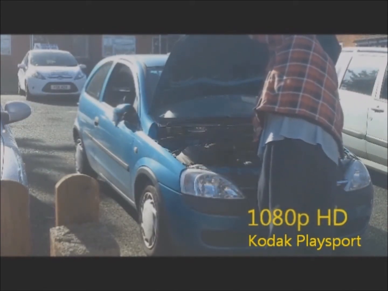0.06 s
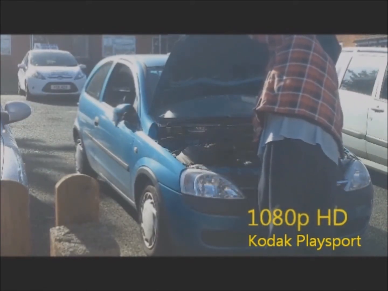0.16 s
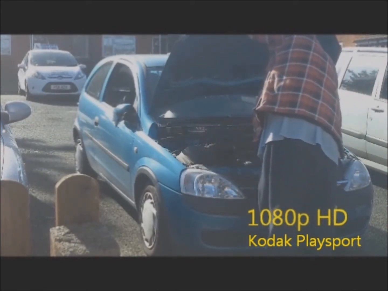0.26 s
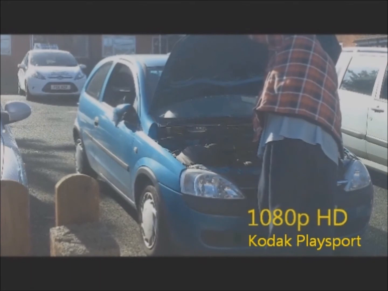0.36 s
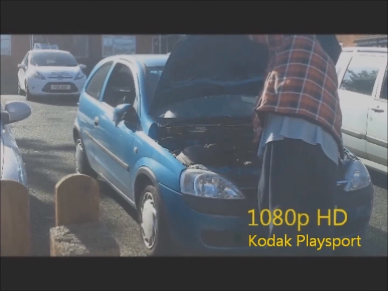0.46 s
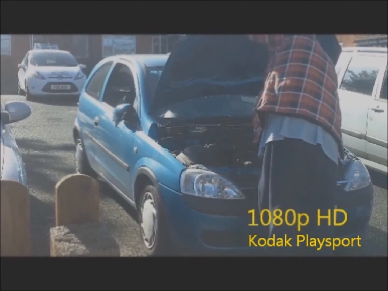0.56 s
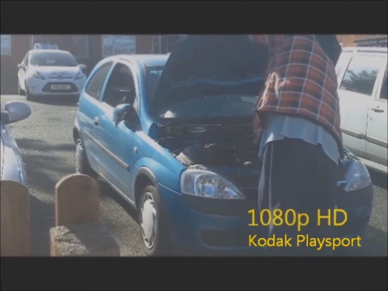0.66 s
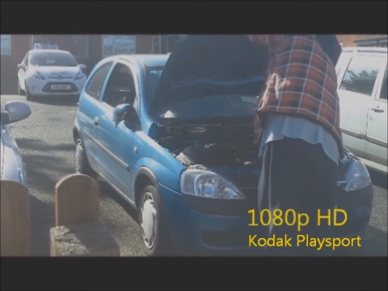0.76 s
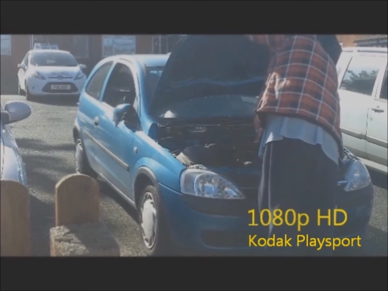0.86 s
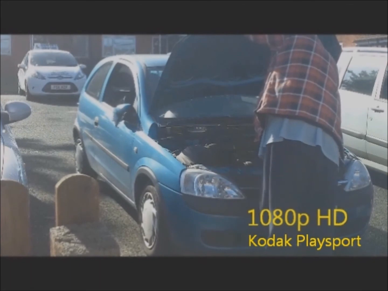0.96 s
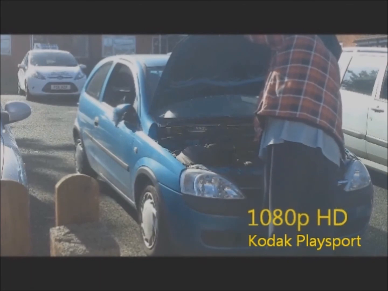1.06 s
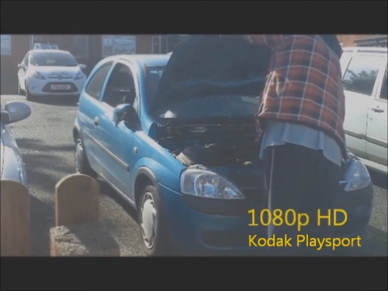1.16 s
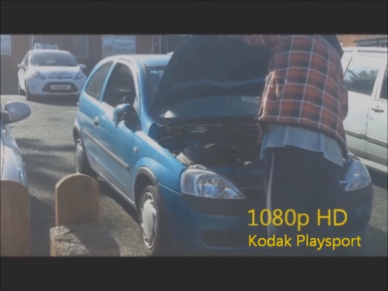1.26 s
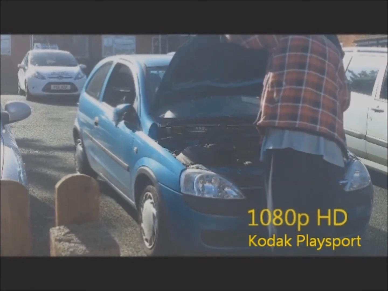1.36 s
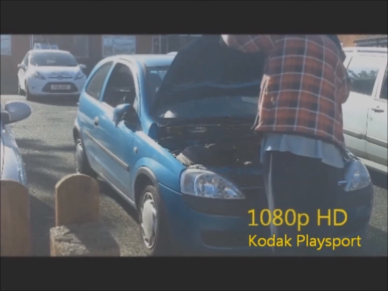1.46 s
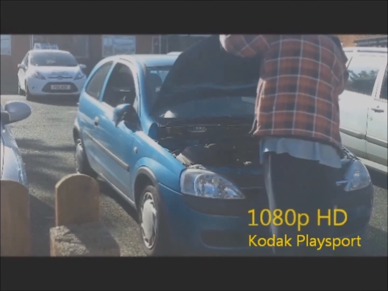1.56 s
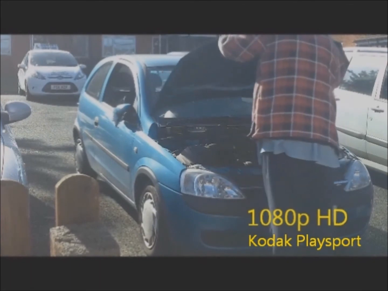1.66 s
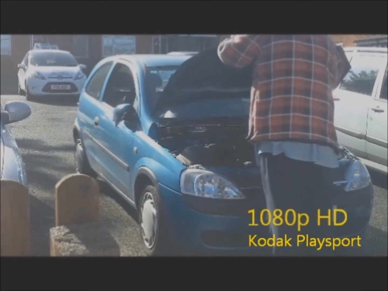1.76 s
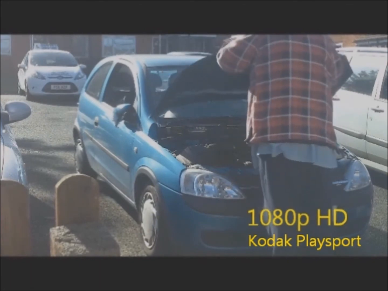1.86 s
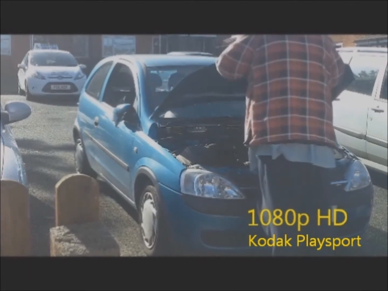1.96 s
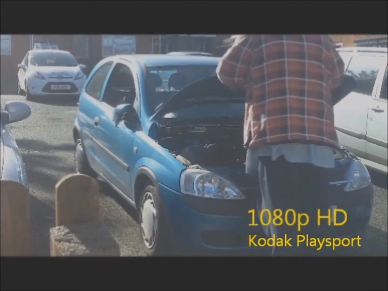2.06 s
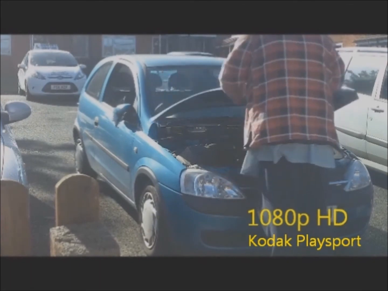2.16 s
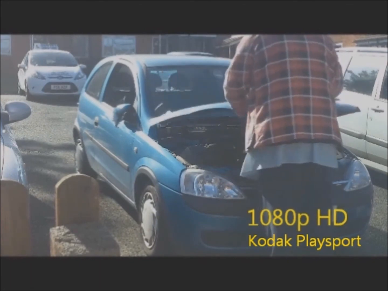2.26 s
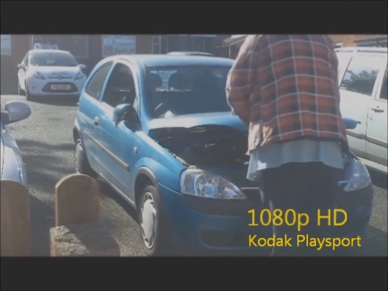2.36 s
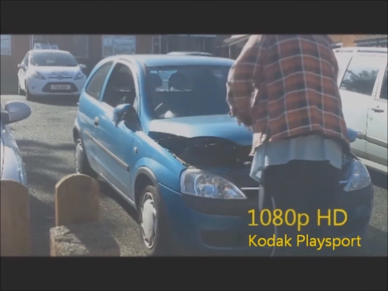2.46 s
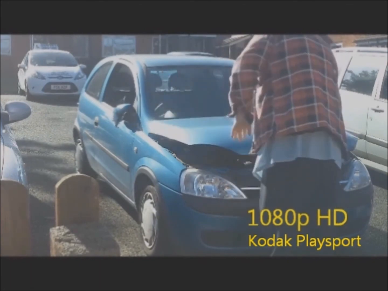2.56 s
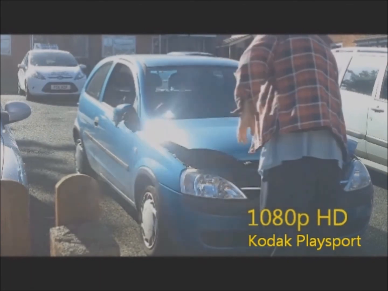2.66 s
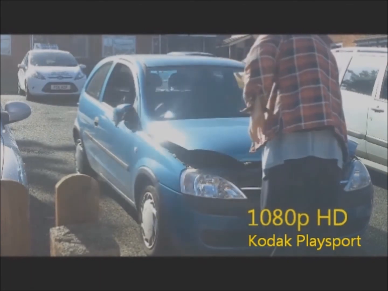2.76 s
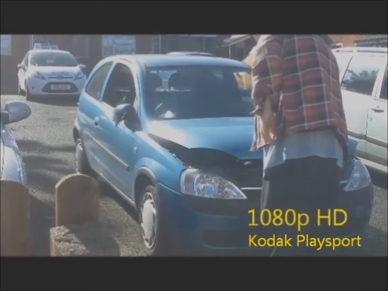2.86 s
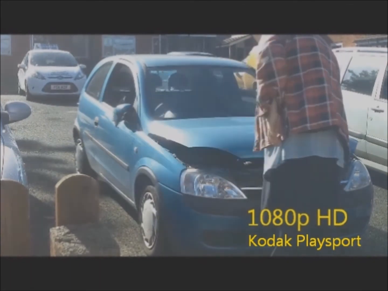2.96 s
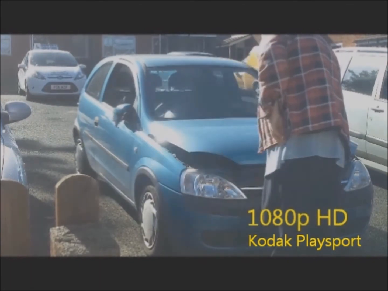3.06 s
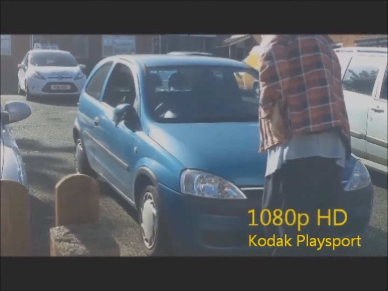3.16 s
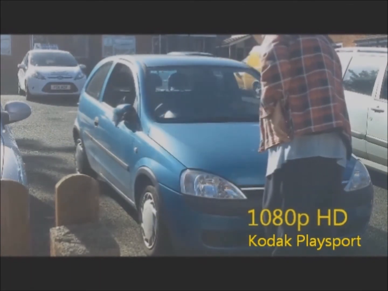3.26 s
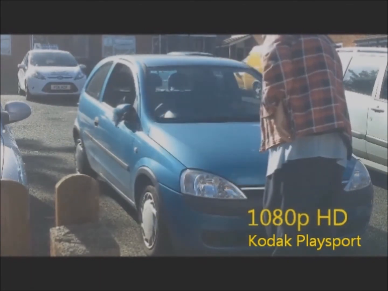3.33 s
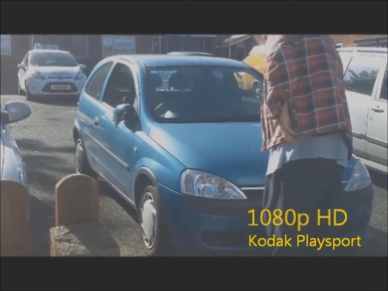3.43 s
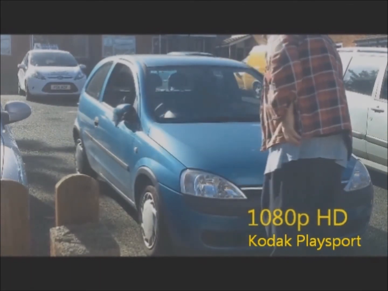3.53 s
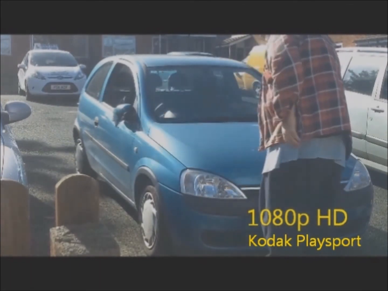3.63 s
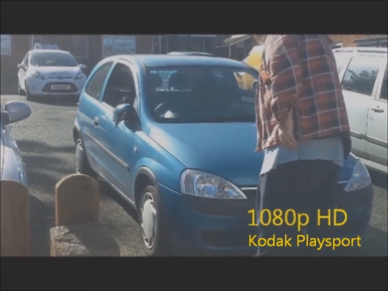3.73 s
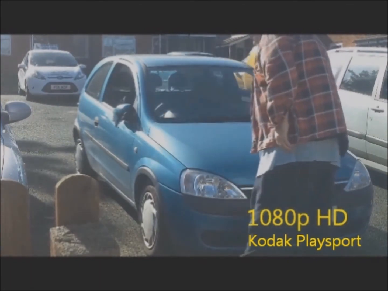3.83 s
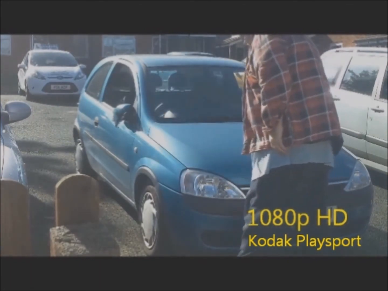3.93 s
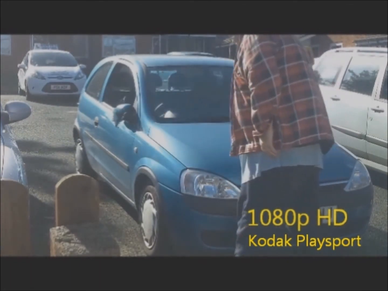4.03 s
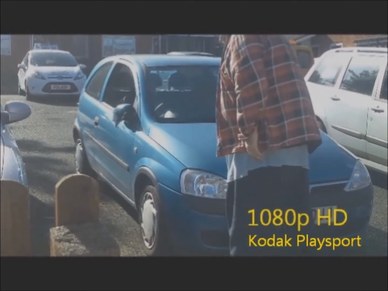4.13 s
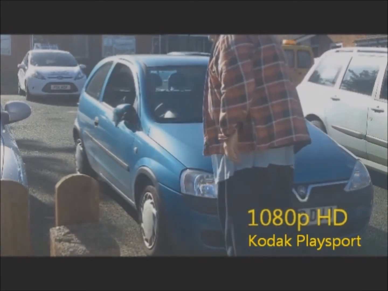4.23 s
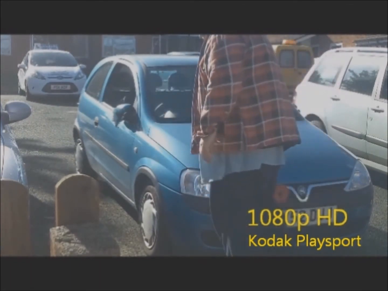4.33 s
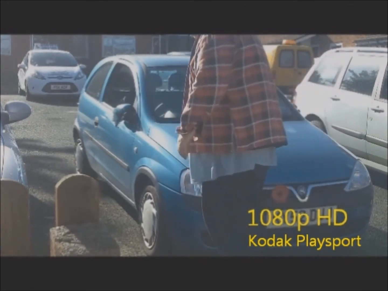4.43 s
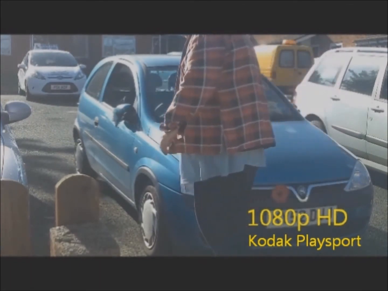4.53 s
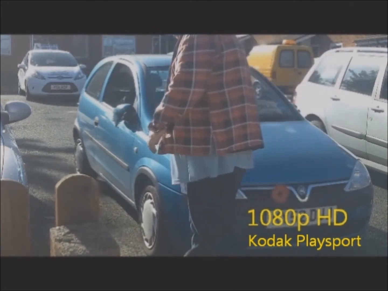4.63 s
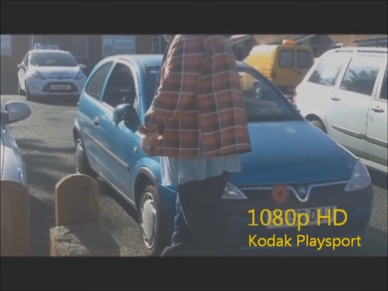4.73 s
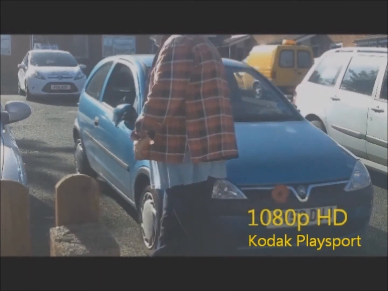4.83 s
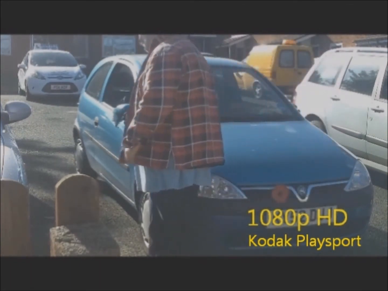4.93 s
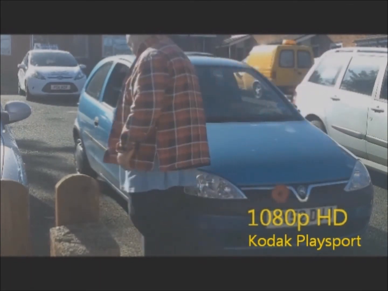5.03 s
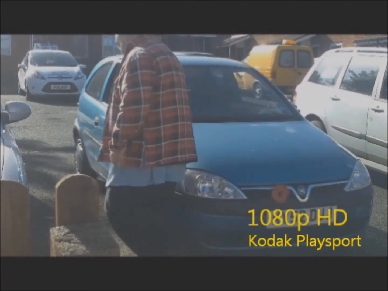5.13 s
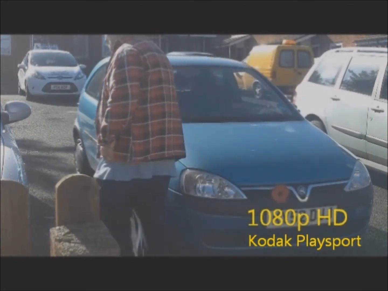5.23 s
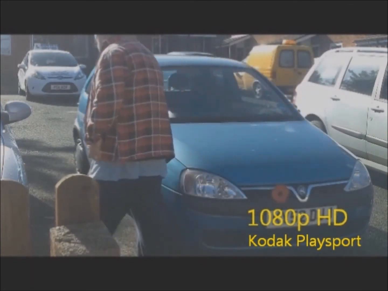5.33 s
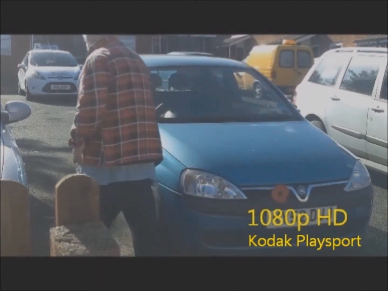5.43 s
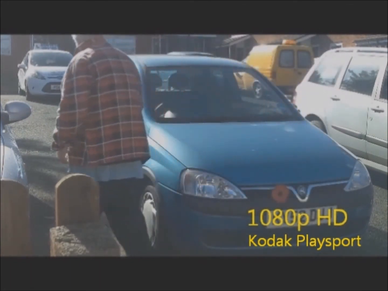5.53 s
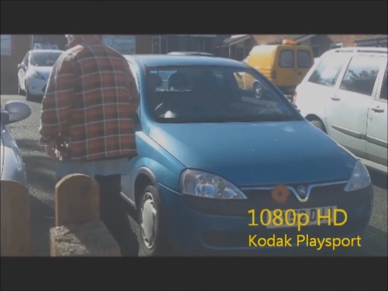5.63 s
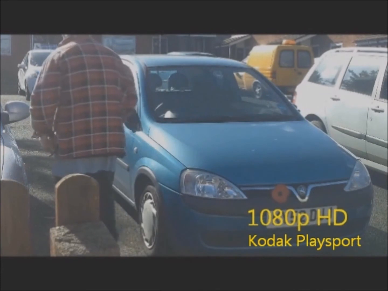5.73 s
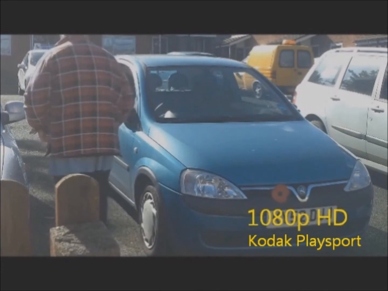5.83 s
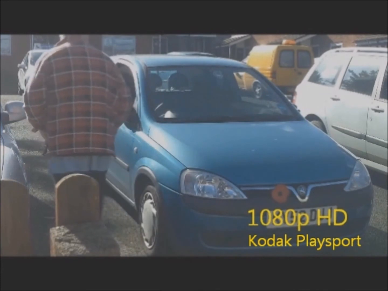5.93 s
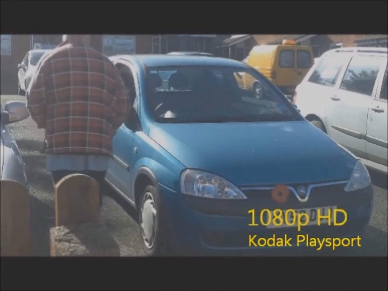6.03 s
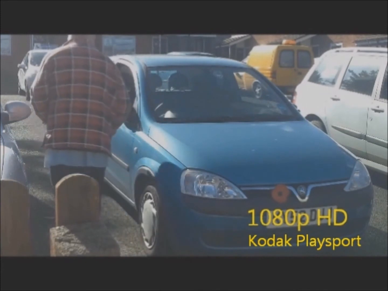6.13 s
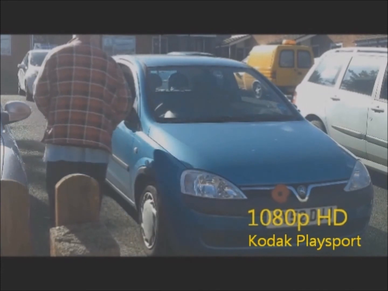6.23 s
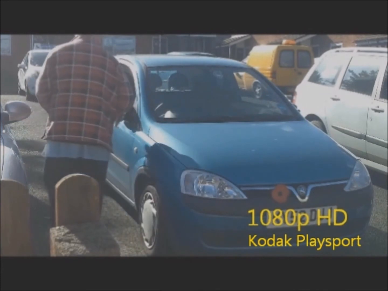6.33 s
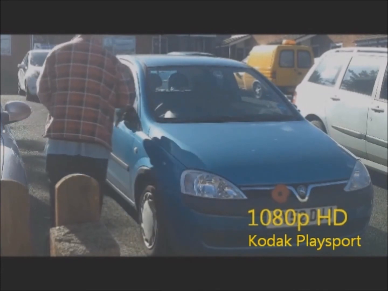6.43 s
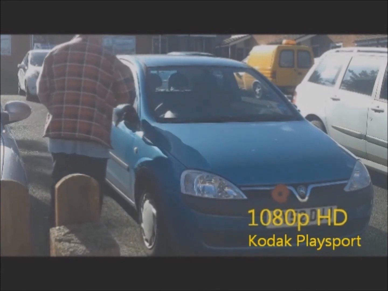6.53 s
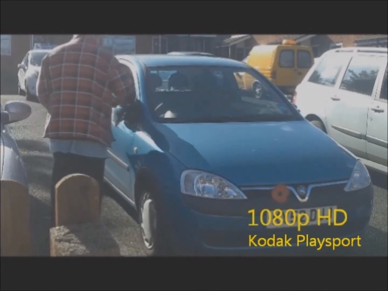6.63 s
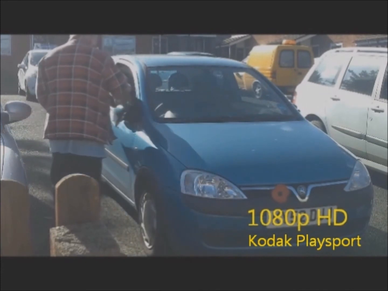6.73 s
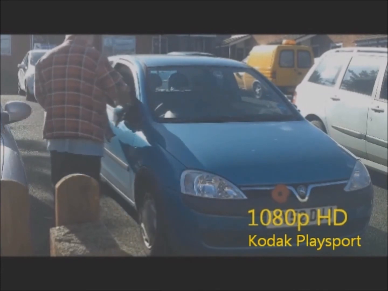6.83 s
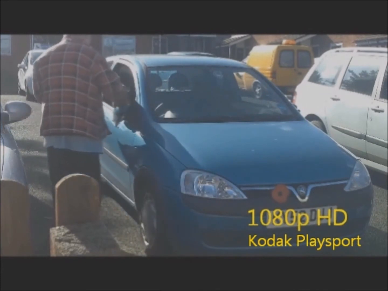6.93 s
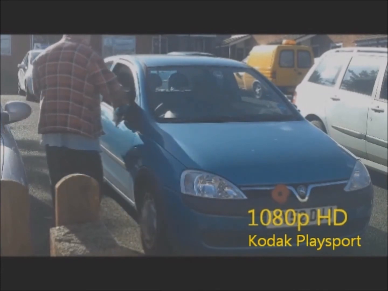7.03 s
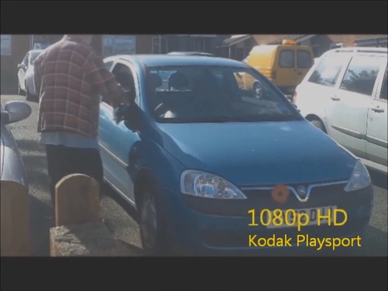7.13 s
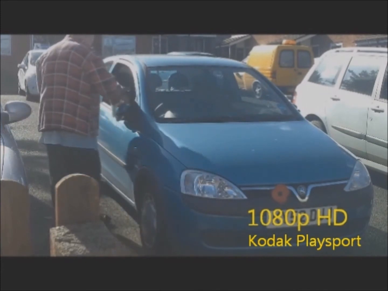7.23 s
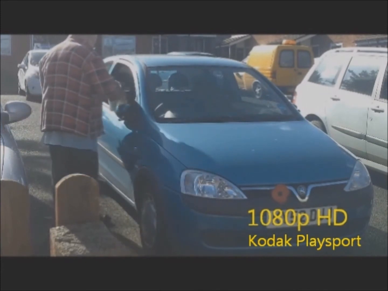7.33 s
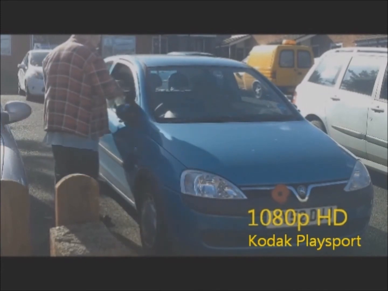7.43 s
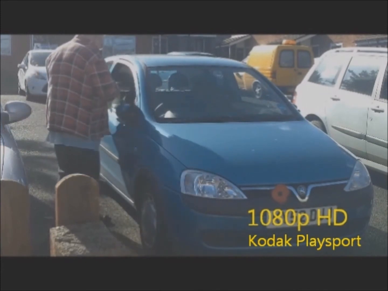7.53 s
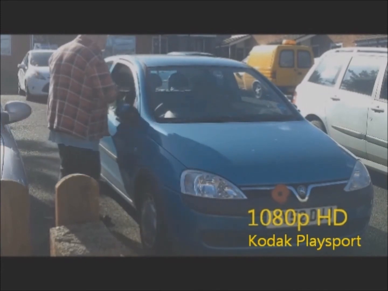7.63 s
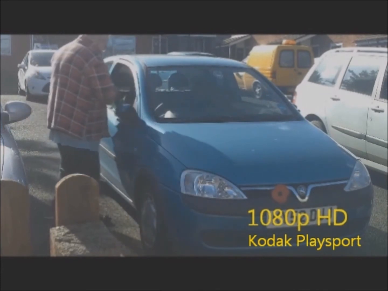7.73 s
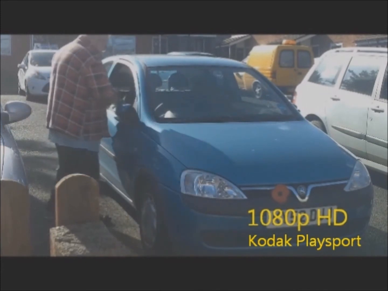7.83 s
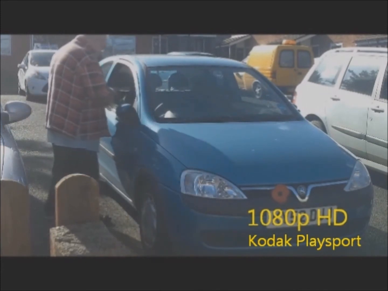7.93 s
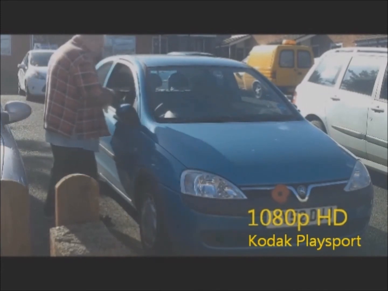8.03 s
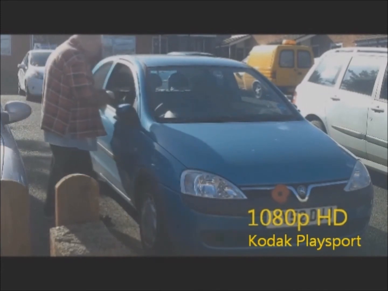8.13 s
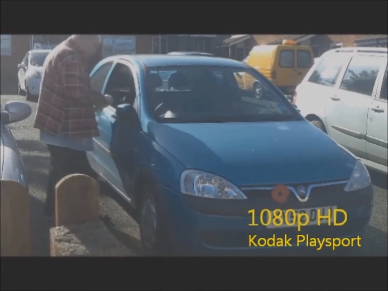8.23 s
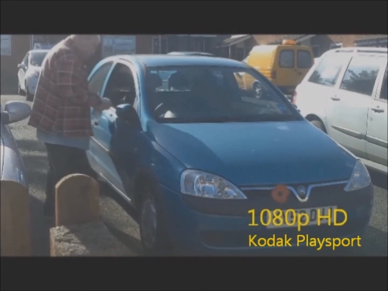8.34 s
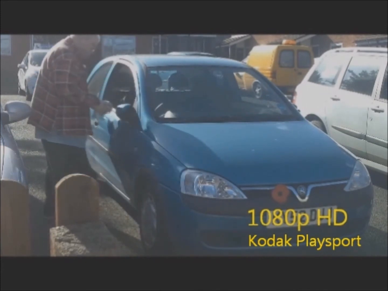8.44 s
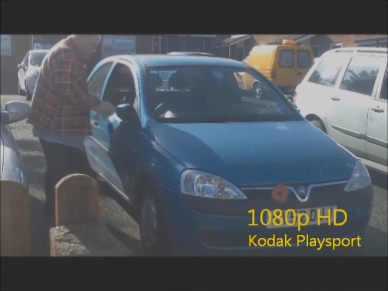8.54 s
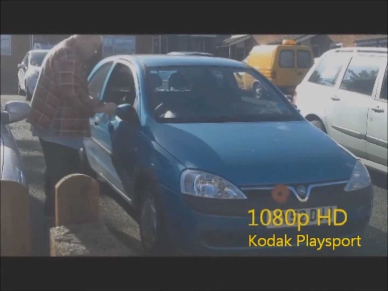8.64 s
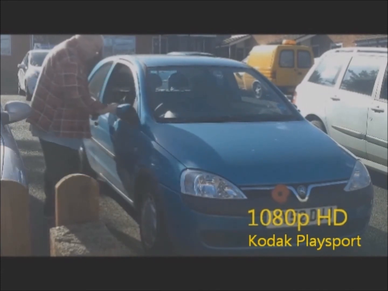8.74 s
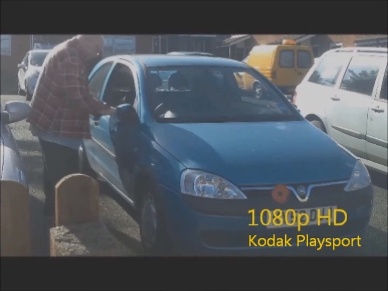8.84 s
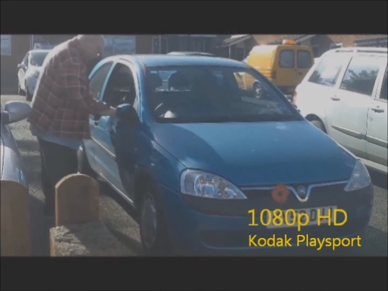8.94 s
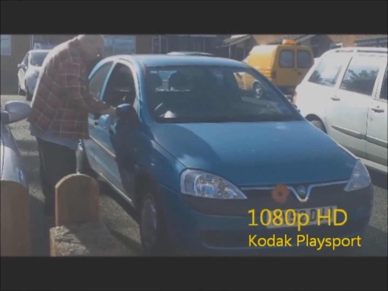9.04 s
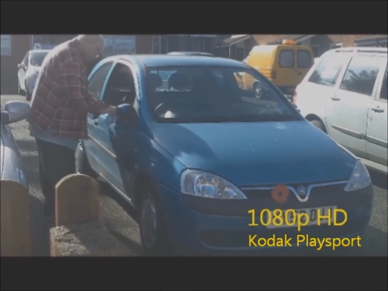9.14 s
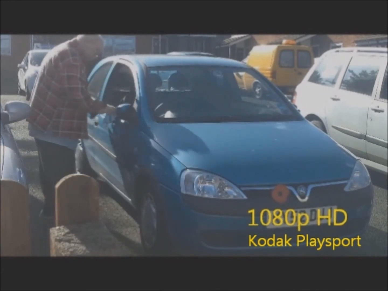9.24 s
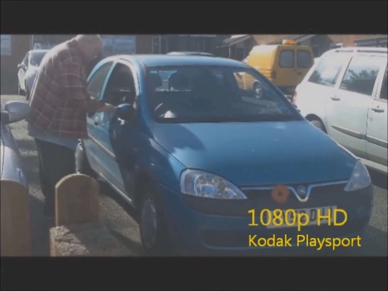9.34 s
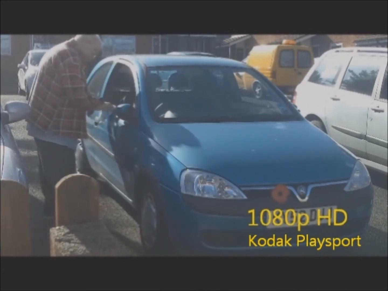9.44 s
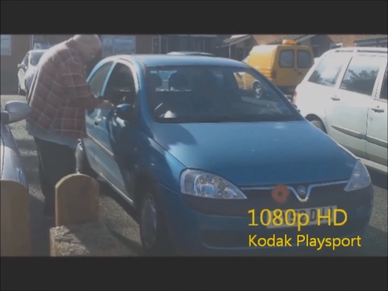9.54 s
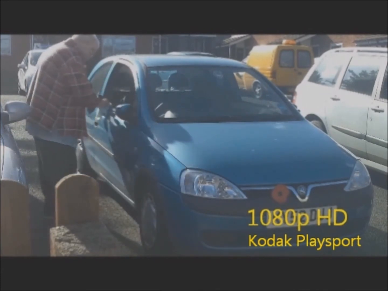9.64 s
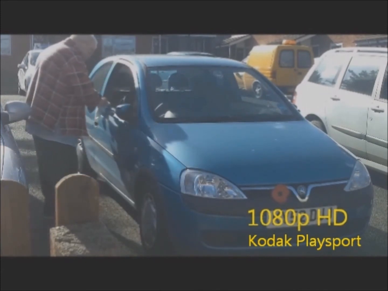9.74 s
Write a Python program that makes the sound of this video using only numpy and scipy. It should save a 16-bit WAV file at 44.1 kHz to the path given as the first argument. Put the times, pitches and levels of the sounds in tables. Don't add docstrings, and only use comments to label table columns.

```python
import sys
import numpy as np
from scipy import signal
from scipy.io import wavfile
from scipy.ndimage import uniform_filter1d

SR = 44100
rng = np.random.default_rng(int(sys.argv[2]) if len(sys.argv) > 2 else 0)


def nominal_scale(level):
    x = np.asarray(level, float) / 20
    return 10 ** x


def waveform_to_disk(signal):
    frames = np.transpose(np.atleast_2d(signal))
    scaled = np.clip(frames, -1, 1) * 32767
    samples = np.round(scaled).astype(np.int16)
    wavfile.write(sys.argv[1], SR, samples)


N = 431738

# frequency in Hz, density in dB per Hz.
TRAFFIC_SPECTRUM = [(8.8, -37.5), (15, -5.5), (33, -4), (81, -2.5), (113, -13), (150, -8), (172, -17.5),
                    (229, -13.5), (334, -17.5), (1040, -16.5), (2010, -24), (3000, -26), (3900, -41),
                    (6600, -120)]
# time in seconds, level in dB.
TRAFFIC_LEVEL = [(0, -48), (1.0, -48.6), (3.1, -49), (3.8, -47.5), (5.5, -50), (9.79, -50.5)]

# start in seconds, peak in dB, clatter T60 in seconds, rise in seconds, brightness in Hz.
KNOCK_CONTACTS = [
    (.822, -23.5, 0.046, 0.0017, 7000),
    (.828, -25.5, 0.044, .002, 8000),
    (.840, -24.5, 0.054, 0.0018, 4500),
    (.848, -25, 0.048, 0.0014, 4500),
    (.855, -32, 0.11, .002, 4000),
    (.89, -44, 0.15, .01, 3500),
]
SLAM_CONTACTS = [(3.3255, -8, 0.021, 0.0034, 16000), (3.335, -16, .04, .001, 7000),
                 (3.343, -24, .04, .002, 6000), (3.350, -17, 0.039, 0.0045, 9000),
                 (3.357, -17.5, .04, 0.0023, 12000), (3.3635, -13.5, 0.044, 0.0014, 14000),
                 (3.373, -21, 0.041, .002, 12000), (3.3795, -25, 0.045, .001, 9000),
                 (3.390, -32, .05, 0.0018, 9000), (3.403, -31, 0.033, .002, 9000),
                 (3.443, -33, .06, .002, 6000)]
# centre in Hz, width in Hz, level in dB.
PROP_MODES = [(495, 32, 5), (644, 34, 3.5), (1170, 80, -6), (1670, 110, -7), (2280, 330, 0), (3000, 75, 0),
              (4920, 250, -8)]
# centre in Hz, width in Hz, level in dB.
LATCH_MODES = [(920, 67, 0), (997, 110, -2), (1336, 340, 3.5), (2300, 200, -1.5), (2790, 92, 0.5),
               (3380, 110, 1), (4010, 110, 0), (4620, 110, -11), (4970, 150, -7), (5300, 140, -12)]

# start in seconds, peak in dB, contact in seconds, signed direction (ratio).
BOUNCES = [(3.329, -18.5, 0.0013, 1), (3.338, -17, 0.0014, 1), (3.351, -18, 0.0031, 0.93),
           (3.359, -10, 0.0025, 1), (3.366, -7, 0.0077, 1), (3.379, -13, 0.0044, 1),
           (3.402, -10.5, .004, -1.05), (3.405, -21, .005, 1), (3.443, -16, 0.0027, 0.81),
           (3.464, -16, 0.0043, 1), (3.488, -18.5, 0.0029, -1.3), (3.513, -16, 0.006, -1.1),
           (3.536, -15, .004, 1), (3.596, -37, 0.0068, -0.88), (.828, -43, 0.0012, 1),
           (.853, -25.5, 0.0055, 1), (0.867, -26, 0.0029, 0.81), (.900, -29, 0.003, -1)]
# frequency in Hz, level in dB, T60 in seconds.
PANEL_MODES = [(69, -4, 0.43), (108.3, -5, 0.97), (130.3, -6.5, .25), (151.8, 1, 0.6), (186, -11, 0.23),
               (252, -5, 0.5), (316, -18.5, .3), (418, -17, .25), (454, -24.5, .25), (620, -35, .2)]
# start in seconds, top in dB, swell in seconds, hold in seconds, fall in dB per second.
PANEL_SHUDDER = [
    (.83, -40, .07, .005, 200),
    (3.327, -20.5, 0.036, 0.094, 84),
]
BODY_SHUDDER = [
    (.83, -41, .025, .03, 150),
    (3.327, -29, .09, .24, 115),
]
CAR_S = 4.6
SWELL_DB = 24
ROCK_HZ, ROCK_DB = 7.94, 2.5

# frequency in Hz, T60 in seconds.
YARD_DECAY = [(200, 1.0), (1000, 1), (3000, 0.45), (6000, 0.23), (10000, 0.15)]
# delay in seconds, level in dB.
WALL_ECHOES = [
    (.075, -30),
    (0.119, -31.5),
    (.16, -30),
    (.2, -30.5),
    (.24, -34.5),
    (.28, -36),
    (.36, -38.5),
]

# start in seconds, peak in dB, centre in Hz.
TAPS = [
    (2.054, -41, 1070),
    (5.058, -33.5, 269),
    (5.066, -31, 234),
    (5.582, -34.5, 423),
    (5.607, -39.5, 940),
    (6.184, -35, 560),
]
# start in
# seconds, peak in # dB, centre in Hz, share of broad edge (ratio).
CLICKS = [(2.3175, -34, 3200, .46), (5.649, -36, 4730, 1.5), (6.154, -42, 3240, 1.5),
          (6.171, -34, 3250, 1.1), (6.3478, -30.5, 3140, 0.79), (6.351, -34, 3300, 0.72),
          (6.878, -42, 2500, .8), (7.094, -36, 2920, .8), (7.153, -27.5, 5200, .56),
          (7.179, -36, 3320, 1.1), (7.508, -32.5, 1780, .6), (7.5153, -28.5, 3120, .92),
          (9.766, -43, 2400, .9)]
# start in seconds, length in seconds, level in dB.
SCRAPES = [
    (6.15, 0.038, -47.5),
    (6.999, .05, -55),
    (7.469, 0.045, -52),
    (8.387, 0.081, -46),
    (8.559, 0.038, -57),
    (8.626, 0.088, -47),
]
# start in seconds, peak in dB, centre in Hz.
KEYS = [(8.393, -39, 2160), (8.404, -36, 5200), (8.408, -29, 2030), (8.417, -29.5, 1850),
        (8.421, -29, 4770), (8.424, -33, 1800), (8.430, -34, 1550), (8.439, -41, 5000), (8.464, -38, 1900),
        (8.564, -39, 4900), (8.571, -39, 3200), (8.602, -41, 5000), (8.624, -35, 3070), (8.644, -39, 3300),
        (8.651, -39, 3000), (8.665, -32, 3430), (8.672, -31.5, 3200), (8.6765, -28, 2940),
        (8.689, -35, 5200)]
CLICK_Q, CLICK_T60_S = 3.7, .023
KEY_Q, KEY_T60_S, KEY_EDGE = 5, 0.017, 0.67
TAP_WIDTH_HZ, TAP_T60_S = 100, 0.034

# time in seconds, level in dB.
BREEZE = [(5.8, -56), (6.2, -48.5), (7.0, -44), (7.2, -38), (8.1, -37.5), (8.5, -35.5), (9.5, -34),
          (9.79, -24.5)]
# peak time in seconds, peak in dB, sharp edges in dB re peak, build-up in seconds.
GUSTS = [(6.25, -48, 11, .03), (6.52, -37, -10, .25), (6.65, -36, -7, .07), (6.87, -36, -4.5, 0.18),
         (7.04, -34, -13, .12), (7.45, -38, -2, .07), (7.57, -33, -14, .12), (7.8, -29.5, -15, .06),
         (8.25, -23.5, -18, .08), (8.37, -36.5, -4.5, .07), (8.5, -29, -22, 0.22), (8.58, -34.5, 1, .06),
         (8.7, -26.5, -30, .2), (8.77, -26.5, -12, .1), (9.08, -19.5, -11.5, .22), (9.24, -22, -13, .06),
         (9.4, -19.5, -23, .14), (9.59, -24.5, -9, .06), (9.73, -20, -13, 0.056)]
# peak time in seconds, peak in dB, rise in seconds, signed direction (ratio).
EDDIES = [(6.258, -20, 0.0022, 0.97), (6.434, -27.5, .003, -0.93), (6.649, -18.5, 0.0028, -1),
          (7.446, -24, .003, -0.94), (7.455, -25, 0.0046, 1), (7.795, -30.5, 0.0023, -1.2),
          (8.387, -22, 0.0027, -0.91), (8.454, -19, 0.0041, -1.1), (8.583, -26.5, 0.0013, -0.94),
          (8.764, -27.5, 0.0025, -1.1), (8.866, -25, 0.004, -1.1), (8.935, -18, 0.0011, 1),
          (8.966, -20.5, 0.0016, -1.1), (8.988, -21, .002, 1), (9.003, -18, 0.002, 1),
          (9.050, -22, 0.0016, -1.1), (9.059, -11.5, 0.0042, 1), (9.066, -9.5, 0.0024, -0.96),
          (9.077, -19, .006, 1), (9.089, -25, 0.001, -1), (9.24, -19, 0.0036, -1.1),
          (9.498, -27, 0.0016, 1), (9.588, -21, 0.0012, -1.1), (9.603, -16.5, 0.003, -1.1),
          (9.67, -19, 0.0032, -1.2), (9.766, -10, 0.0021, 1), (9.776, -19, 0.0019, -1.1),
          (9.784, -16, .008, -1.2)]
BUILD_DB, CALM_EDGE_DB = 16, -22
GUST_FALL_DB_PER_S, EDGE_FALL_DB_PER_S = 250, 400

# start in seconds, level in dB, from in Hz, to in Hz, length in seconds.
CHIRP = (9.464, -49, 4450, 5050, .02)

# frequency in Hz,
# gain in dB.
PORT_RESPONSE = [(3500, -1), (4900, -2), (5150, -6.5), (6500, -15), (7100, -20.5), (7500, -27.5),
                 (9000, -30), (9400, -22), (12000, -21.5), (13200, -23), (15250, -23), (15450, -40),
                 (15800, -91)]
# centre in Hz, width in Hz, depth in dB.
TREBLE_DIPS = [(4196, 212, -15.5), (7970, 320, -6), (8720, 100, -13), (12650, 300, -22)]
HISS_DB = -53.5
CEILING = .62


def evened(x):
    return x / np.sqrt(np.mean(x ** 2) + 1e-20)


def read(points, hz):
    f, value = np.transpose(points)
    return np.interp(np.log(hz + 1), np.log(f + 1), value)


def curve(rows, off_db=-120):
    s, *columns = np.transpose(rows)
    t = np.arange(N) / SR
    return [np.interp(t, s, c, off_db, off_db) for c in columns]


def add(mix, s, sound):
    part = mix[round(s * SR):][:len(sound)]
    part += sound[:len(part)]


def resonate(x, hz, width_hz):
    pole = np.exp((2j * np.pi * hz - np.pi * width_hz) / SR)
    return 2 * signal.lfilter([1 - abs(pole)], [1, -pole], x).real


def band(x, lo_hz, hi_hz, order=2):
    sos = signal.butter(order, [lo_hz, hi_hz], "bandpass", fs=SR, output="sos")
    return signal.sosfilt(sos, x)


def burst(t60_s, rise_s, size=6000):
    t = np.arange(size) / SR
    rise = 1 - np.exp(-t / max(rise_s, 1e-4))
    shape = rise * nominal_scale(-60 * t / max(t60_s, .004))
    return rng.standard_normal(size) * shape / shape.max()


def traffic(patchy_db, tilt_db):
    frames, hz = N // 512 + 5, np.fft.rfftfreq(2048, 1 / SR)
    a, b, patches = rng.standard_normal((frames, 1025, 3)).T
    patches = uniform_filter1d(patches, 20, 0)
    patches = evened(uniform_filter1d(patches, 8, 1))
    top_hz, top_db = TRAFFIC_SPECTRUM[-3]
    slope_db = top_db + tilt_db * np.log2(hz / top_hz + 1e-9)
    colour_db = np.where(hz < top_hz, read(TRAFFIC_SPECTRUM, hz), slope_db)
    spectra = (a + 1j * b) * nominal_scale(colour_db[:, None] + patchy_db * patches)
    x = signal.istft(spectra, nperseg=2048, noverlap=1536)[1][:N]
    level_db = curve(TRAFFIC_LEVEL, None)[0]
    return x / np.std(band(x, 430, 3160, order=4)) * nominal_scale(level_db)


def clatter(contacts, modes, ring, grit_db):
    start, drive = contacts[0][0] - .01, np.zeros(SR // 2)
    for s, db, t60_s, rise_s, top_hz in contacts:
        hit = band(burst(t60_s, rise_s), 100, min(1.05 * top_hz, 20000))
        add(drive, s - start - .001, nominal_scale(db) * hit)
    grit = uniform_filter1d(rng.standard_normal(len(drive)), 16) * 2.2
    drive *= nominal_scale(grit_db * grit)
    rung = np.zeros(len(drive))
    for hz, width_hz, db in modes:
        rung += nominal_scale(db) * resonate(drive, hz, width_hz) / np.sqrt(width_hz)
    direct = band(drive, 300, 18500, order=1)
    out = np.zeros(N)
    add(out, start, direct + ring * rung * np.linalg.norm(direct) / np.linalg.norm(rung))
    return out


def shudder_gain(rows):
    start_s, db, swell_s, hold_s, fall = np.transpose(rows)[:, :, None]
    u = np.arange(round(CAR_S * SR)) / SR - start_s
    level_db = db - SWELL_DB * np.maximum(1 - u / swell_s, 0) ** 2
    level_db = level_db - fall * np.maximum(u - swell_s - hold_s, 0)
    rock_db = ROCK_DB * np.sin(2 * np.pi * ROCK_HZ * u)
    return (nominal_scale(level_db + rock_db) * (u > 0)).sum(0)


def panel():
    force = np.zeros(round(CAR_S * SR))
    for s, db, contact_s, way in BOUNCES:
        push = np.hanning(max(round(contact_s * 2 * SR), 5))
        add(force, s - .002, way * nominal_scale(db) * push)
    shudder = rng.standard_normal(len(force))
    rung, shaken = np.zeros((2, len(force)))
    for hz, db, t60_s in PANEL_MODES:
        width_hz = np.log(1000) / np.pi / t60_s
        rung += nominal_scale(db) * resonate(force, hz, width_hz) * t60_s
        if hz > 120:
            shaken += nominal_scale(db) * resonate(shudder, hz, 21)
    deep = resonate(shudder, 68, 18) + 0.62 * resonate(shudder, 113, 11) + 0.3 * band(shudder, 22, 53)
    body = shudder_gain(PANEL_SHUDDER) * evened(band(shaken, 120, 595))
    body += shudder_gain(BODY_SHUDDER) * evened(band(deep, 20, 114))
    direct = 0.78 * band(force, 62, 900, order=1)
    return np.pad(direct + 4.6 * rung + body, (0, N - len(force)))


def yard(x, wet_db, wall_smear_s):
    taps = np.zeros(SR)
    at = np.arange(300, SR - 22, 22)
    taps[at + rng.integers(0, 22, len(at))] = rng.choice([-1., 1.], len(at))
    hz, t, z = signal.stft(taps, SR, nperseg=256)
    decay = nominal_scale(-60 * t / read(YARD_DECAY, hz)[:, None])
    tail = signal.istft(z * decay, SR, nperseg=256)[1]
    tail = band(tail, 60, 6000, order=1)
    tail *= nominal_scale(wet_db) / np.linalg.norm(tail)
    for s, db in WALL_ECHOES:
        echo = band(burst(wall_smear_s, 0.004), 400, 4000, order=1)
        add(tail, s, nominal_scale(db) * echo / np.linalg.norm(echo))
    return signal.fftconvolve(x, tail)[:N]


def clicks():
    out = np.zeros(N)
    contacts = [(s, db, hz, TAP_WIDTH_HZ, TAP_T60_S, 0) for s, db, hz in TAPS]
    contacts += [(s, db, hz, hz / CLICK_Q, CLICK_T60_S, edge) for s, db, hz, edge in CLICKS]
    contacts += [(s, db, hz, hz / KEY_Q, KEY_T60_S, KEY_EDGE) for s, db, hz in KEYS]
    for s, db, hz, width_hz, t60_s, edge in contacts:
        x = burst(t60_s, 0.00063, size=3000)
        x[8] += 8
        ring, wide = resonate(x, hz, width_hz), band(x, 2000, 7000)
        sound = ring / abs(ring).max() + edge * wide / abs(wide).max()
        add(out, s, nominal_scale(db + 1.5) * sound)
    for s, length_s, db in SCRAPES:
        sign, chance, size = rng.random((round(length_s * SR), 3)).T
        size_db = -4 * np.log(size + .03)
        slips = np.sign(sign - .5) * (chance < 2500 / SR) * nominal_scale(size_db)
        fade = signal.windows.tukey(len(slips), .5)
        add(out, s, nominal_scale(db) * evened(band(slips, 1100, 5600)) * fade)
    return out


def gusting():
    step = 64
    t = np.arange(0, N + step, step) / SR
    gust_db = curve(BREEZE)[0][np.minimum(np.arange(len(t)) * step, N - 1)]
    edge_db = gust_db + CALM_EDGE_DB
    for s, db, sharp_db, build_s in GUSTS:
        before, after = np.maximum(s - t, 0) / build_s, np.maximum(t - s, 0)
        gust = db - BUILD_DB * before - GUST_FALL_DB_PER_S * after
        edge = db + sharp_db - 1.33 * BUILD_DB * before - EDGE_FALL_DB_PER_S * after
        gust_db, edge_db = np.maximum(gust_db, gust), np.maximum(edge_db, edge)
    return [np.interp(np.arange(N) / SR, t, c) for c in (gust_db, edge_db)]


def wind(lumps_db, edges_db):
    gust_db, edge_db = gusting()
    a, b, c, d = rng.standard_normal((N, 4)).T
    lumps = evened(band(band(a, 17.1, 39.4, order=1), 18.7, 93.7))
    lumps *= nominal_scale(lumps_db * evened(band(b, 6, 24)))
    edges = evened(band(c, 88, 194, order=3))
    edges *= nominal_scale(edges_db * evened(band(d, 10, 43)))
    thuds = np.zeros(N)
    for s, db, rise_s, way in EDDIES:
        u = np.arange(round(6 * rise_s * SR)) / (rise_s * SR)
        pulse = u ** 3 * np.exp(3 * (1 - u))
        add(thuds, s - rise_s, way * nominal_scale(db) * pulse)
    thuds = band(band(thuds, 16, 1000, order=1), 8.4, 650)
    return nominal_scale(gust_db + 0.5) * evened(lumps) + nominal_scale(edge_db - 5) * evened(edges) + thuds


def bird():
    s, db, from_hz, to_hz, length_s = CHIRP
    hz = np.linspace(from_hz, to_hz, round(length_s * SR))
    whistle = np.sin(2 * np.pi * np.cumsum(hz) / SR)
    out = np.zeros(N)
    add(out, s, nominal_scale(db) * np.hanning(len(hz)) * whistle)
    return out


def scene():
    knock = clatter(KNOCK_CONTACTS, PROP_MODES, ring=0.83, grit_db=-4.0)
    slam = clatter(SLAM_CONTACTS, LATCH_MODES, ring=0.86, grit_db=0.0)
    metal = 0.89 * (knock + slam)
    rest = panel() + clicks()
    scatter = evened(band(rng.standard_normal(N), 17, 470, order=1))
    echoes = yard(metal * scatter + rest, wet_db=-20.5, wall_smear_s=0.17)
    background = traffic(patchy_db=0.72, tilt_db=-3) + wind(lumps_db=1.0, edges_db=6.0) + bird()
    return (metal + rest + echoes + background)[None]


def roll_off(x):
    return signal.sosfilt(signal.butter(12, 15620, fs=SR, output="sos"), x)


def record(dry):
    hiss = nominal_scale(HISS_DB) * band(rng.standard_normal(N), 7000, 18000)
    hz = abs(np.fft.fftfreq(4096, 1 / SR))
    gain_db = read(PORT_RESPONSE, hz)
    for centre_hz, width_hz, db in TREBLE_DIPS:
        gain_db = gain_db + db * np.exp(-((hz - centre_hz) / width_hz) ** 2)
    response = np.exp(np.conj(signal.hilbert(np.log(nominal_scale(gain_db)))))
    taps = np.fft.ifft(response).real[:2048]
    heard = signal.oaconvolve(dry + hiss, taps[None])[:, :N]
    return roll_off(CEILING * np.tanh(heard / CEILING))


dry = scene()
out = record(dry)
waveform_to_disk(out)
```